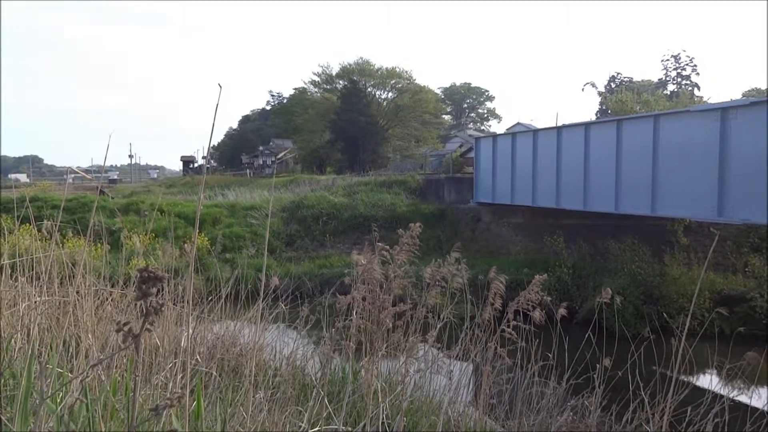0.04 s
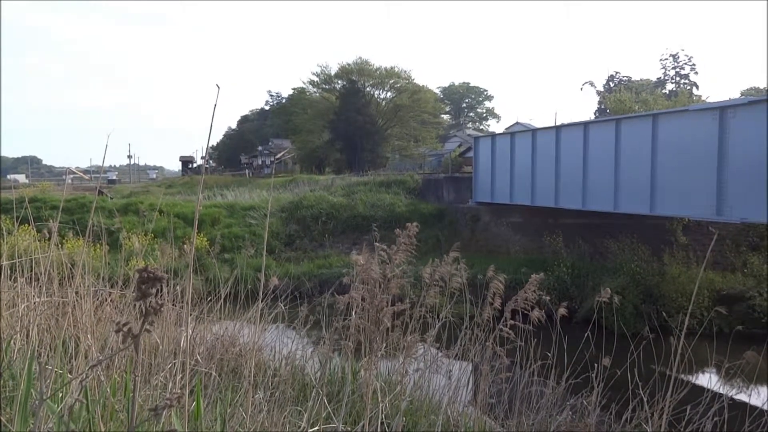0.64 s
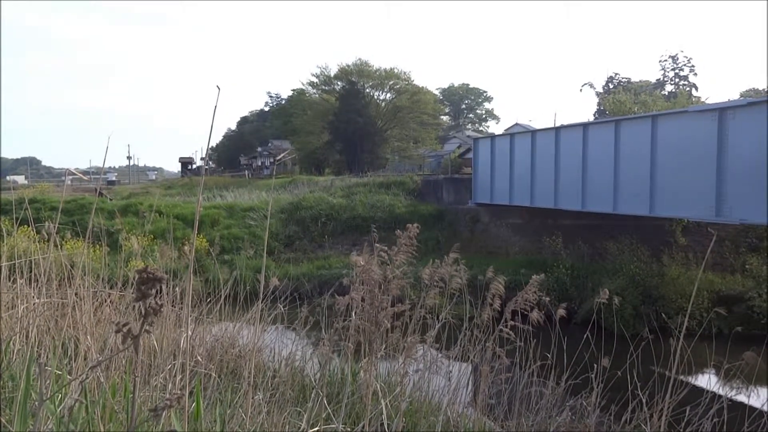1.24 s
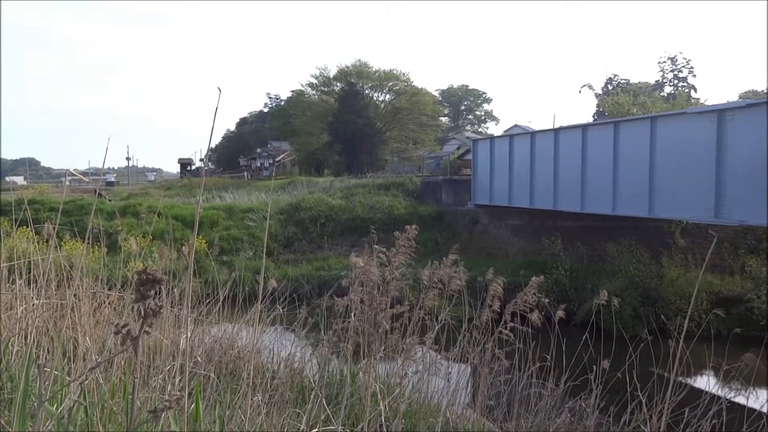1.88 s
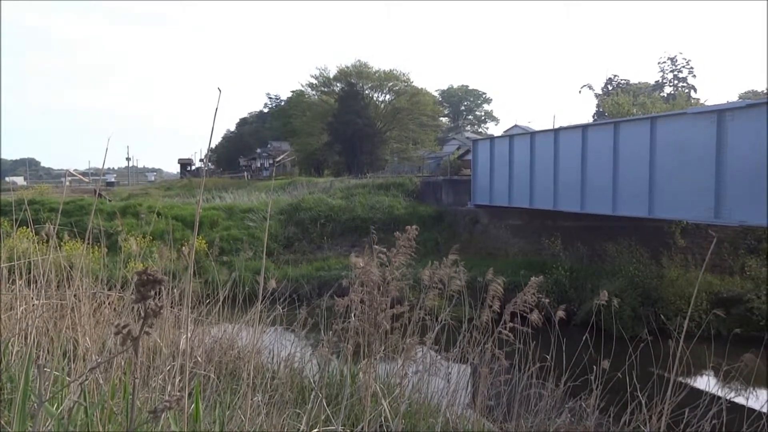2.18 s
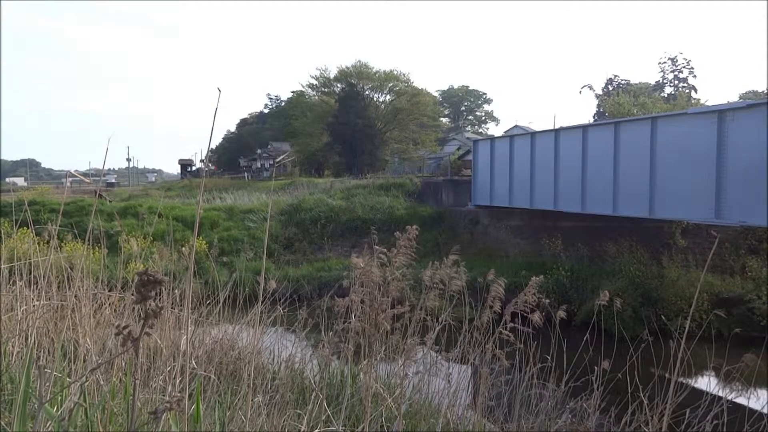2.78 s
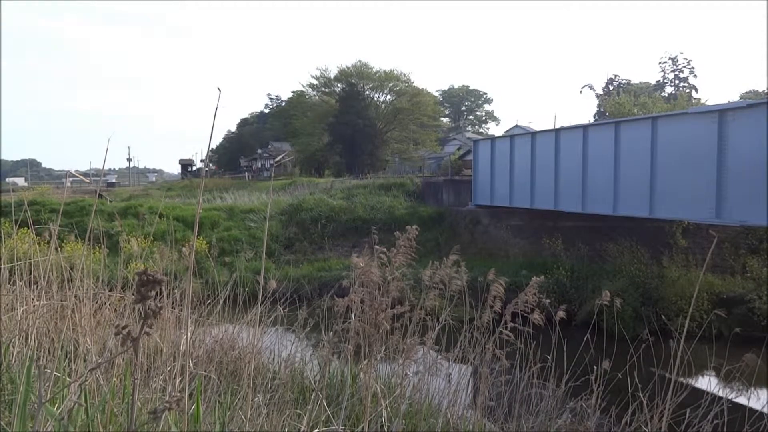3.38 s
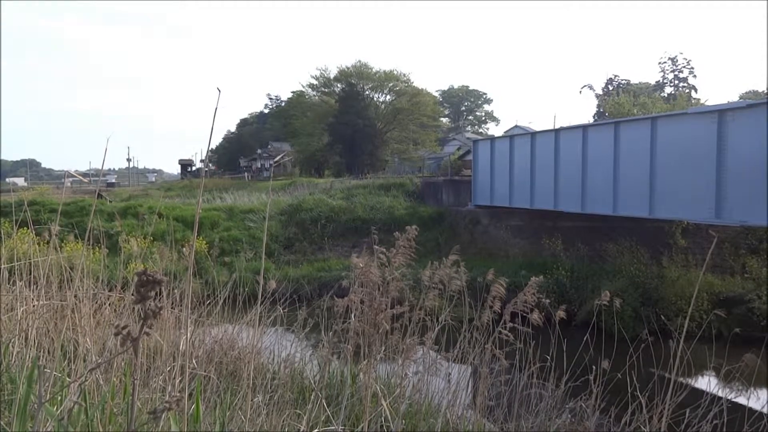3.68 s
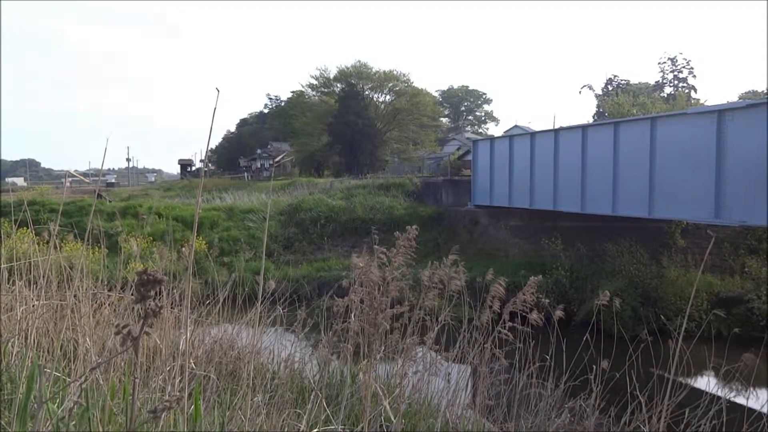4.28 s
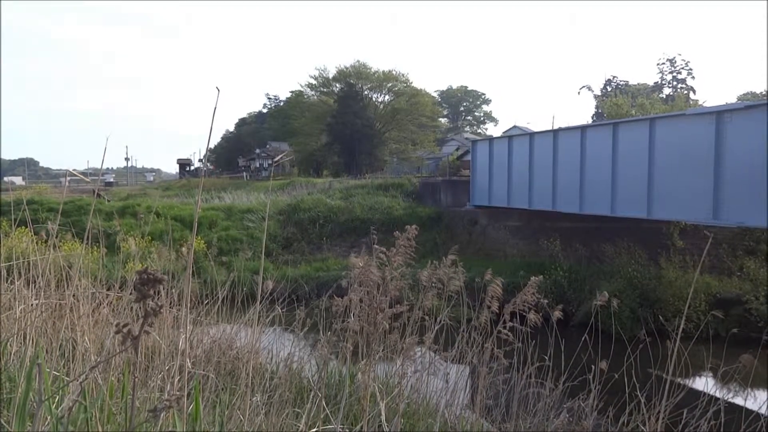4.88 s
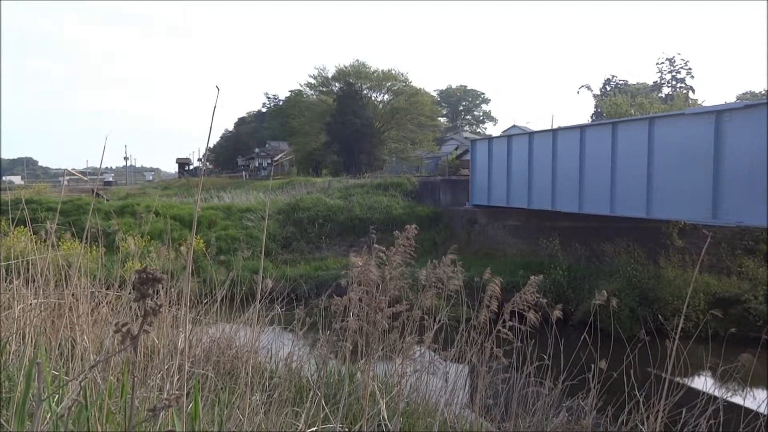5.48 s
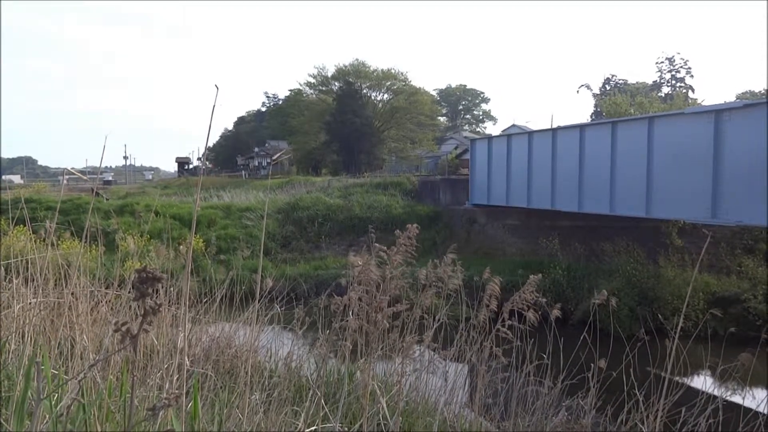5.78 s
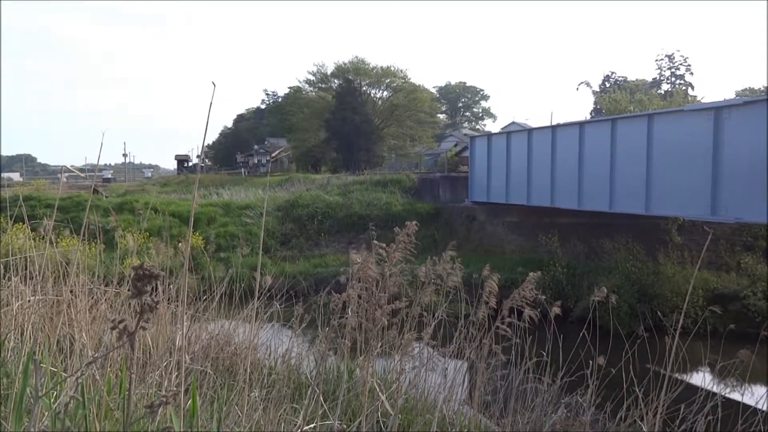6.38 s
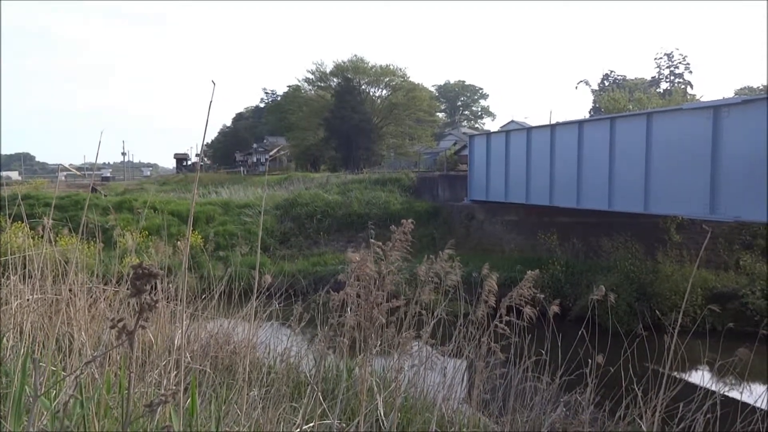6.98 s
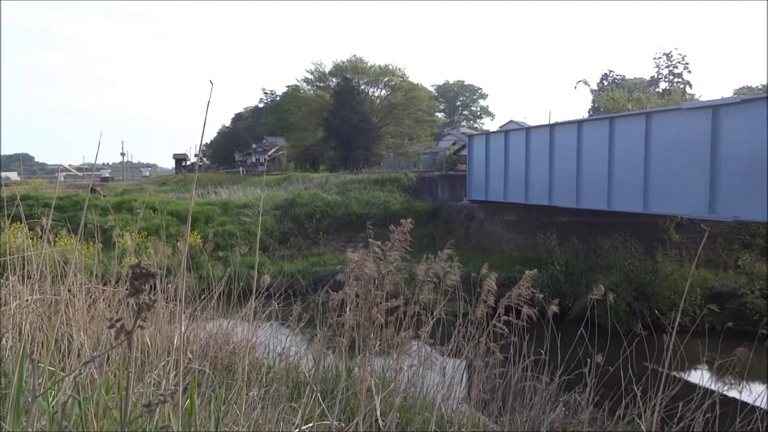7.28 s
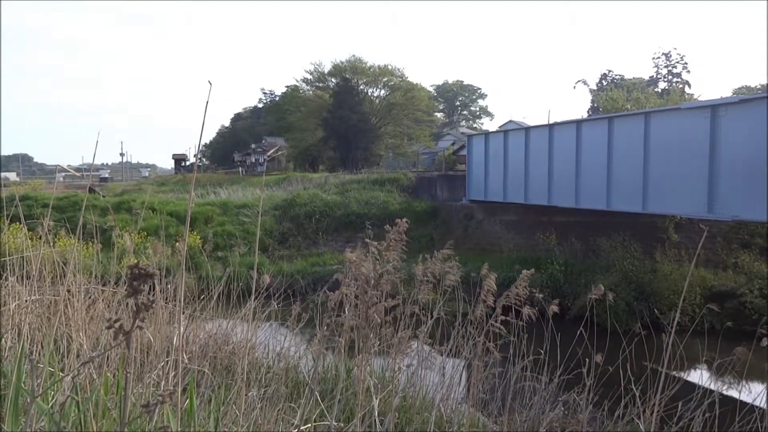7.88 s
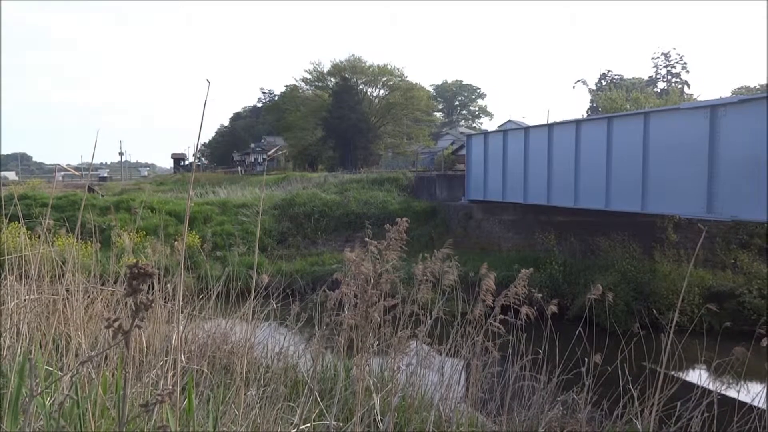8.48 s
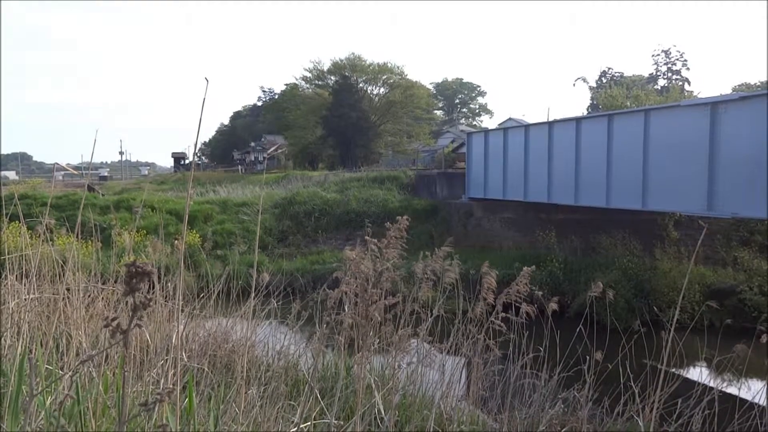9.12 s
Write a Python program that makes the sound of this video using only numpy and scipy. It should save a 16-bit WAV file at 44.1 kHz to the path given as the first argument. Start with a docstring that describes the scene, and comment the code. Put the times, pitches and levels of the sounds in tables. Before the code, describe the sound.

A very high, thin buzz from two crickets runs for the whole nine seconds, over a soft countryside rush on a riverbank. Small birds whistle and chip faintly in the distance, busiest in the first three seconds. Wind bumps the microphone at the start, then drops away. From about 1 to 2 seconds a bullfrog gives one low, mooing bellow that swells and fades. Light puffs of wind follow. A farther frog answers at about 3.6 seconds, and two faint, hoarse cries slide downward, at roughly 3.6 to 4.5 and 5 to 5.8 seconds. Three more distant frog calls come between 5.7 and 7.5 seconds. From about 4.5 seconds, strong gusts thump and flutter on the microphone, becoming the loudest sound and partly covering the calls. They ease around 7.7 seconds and return from 8.5 seconds to the end.

```python
"""A bullfrog bellows from a reedy riverbank; farther frogs answer, with two harsh cries among them.
Each frog's vocal pulses ring its body. Two bush crickets scrape a very high buzz from their wings
in the grass, and small birds whistle and chip far off over a soft countryside rush.
Gusts of wind thump on the microphone as their eddies strike it, hardest in the second half."""
import sys
import numpy as np
from scipy import signal
from scipy.fft import rfft, irfft, next_fast_len
from scipy.io import wavfile
from scipy.ndimage import uniform_filter1d, minimum_filter1d, map_coordinates

SR = 44100
rng = np.random.default_rng(int(sys.argv[2]) if len(sys.argv) > 2 else 0)


def transcribe(signal):
    """Save signal, clipped to [-1, 1], as a 16-bit WAV file at the path in sys.argv[1]."""
    frames = np.atleast_2d(signal).T
    limited = np.clip(frames, -1, 1)
    pcm = np.round(limited * 32767).astype(np.int16)
    wavfile.write(sys.argv[1], SR, pcm)


N = 407925

# tone of the far rush and of the low hum under it: freq_hz, level_db
RUSH_EQ = [(290, -43), (500, -1), (777, 1), (1080, 1), (1190, 3), (2510, -4.5), (2780, -7.5), (3350, -7),
           (3630, -7.5), (4230, -9), (8000, -16.5), (10400, -36), (17600, -120)]
HUM_EQ = [(20, 15), (80, -2), (160, -3), (300, 14.5), (450, 11), (650, -44), (1200, -57)]
# fader ride of the far rush: time_s, level_db
RUSH_LEVEL = [(0, -47.5), (1.05, -47.5), (1.5, -45), (2.2, -47.5), (3.55, -47), (3.9, -44.5), (4.5, -47),
              (8.2, -48.5), (9.25, -46)]
# how alike the bed is on left and right: freq_hz, correlation
BED_LIKENESS = [(100, 1), (700, 0.088), (2000, 0.35), (4000, 0.59), (7000, 1)]
# reverb of the riverbanks: freq_hz, t60_s
BANK_DECAY = [(200, 0.63), (1500, 0.61), (5000, 0.36), (12000, 0.19)]

# light wind between gusts, with its calms: time_s, strength_db
BREEZE = [(0, -37.5), (.95, -50.5), (1.15, -63.5), (1.95, -60), (2.23, -47), (2.9, -42.5), (3.72, -37.5),
          (3.82, -63), (4.03, -67), (4.13, -38), (4.33, -51.5), (4.45, -33), (7.18, -34), (7.7, -38),
          (8.17, -45), (9.12, -39), (9.25, -64)]
# gusts: start_s, hold_s, strength_db, extra_flutter_db
GUSTS = [(0.026, 0.062, -22, -8), (.18, 0.044, -30.5, 9.5), (0.291, 0.11, -30.5, -2),
         (0.625, 0.12, -38.5, 1), (0.901, 0.026, -30.5, -6), (2.214, 0.098, -42, -1),
         (2.484, 0.072, -40.5, -4), (2.716, 0.17, -38, 2), (3.129, 0.033, -29, -5.5),
         (3.247, 0.013, -35.5, 18), (3.506, 0.046, -31, 3.5), (3.633, 0.033, -31, 3.5),
         (4.418, 0.18, -30, 5.5), (4.643, 0.16, -25, 2), (4.84, 0.073, -31.5, 4), (4.975, 0.234, -21.5, 3),
         (5.219, .14, -22, -3), (5.392, 0.074, -24.5, 1), (5.551, 0.15, -25, 1), (5.834, 0.012, -24, 1.5),
         (5.938, 0.14, -24, -3), (6.119, .14, -23.5, 4), (6.294, .2, -25.5, 0.5), (6.576, .04, -31.5, 6.5),
         (6.74, 0.285, -21, -2), (7.052, 0.15, -29, 0), (7.228, 0.13, -22.5, -2.5), (7.413, .14, -25, 1),
         (7.796, 0.0083, -28, -0.5), (7.888, 0.12, -33, -3.5), (8.257, 0.031, -34, 2.5),
         (8.37, 0.079, -34, -15), (8.547, 0.077, -25.5, 2.5), (8.691, 0.12, -26, 3.5),
         (8.867, 0.23, -23.5, 4.5), (9.136, 0.024, -32.5, 11.5)]
# tone of strong rumble, weak puffs and fast flutter: freq_hz, level_db
RUMBLE_EQ = [(15, -38), (30, -34), (50, -18), (90, -7), (160, 2.5), (220, -2), (300, -9.5), (450, -29),
             (1500, -120)]
PUFF_EQ = [(15, -19), (40, -4), (90, 8), (140, 2), (220, -9.5), (450, -51), (1500, -120)]
FLUTTER_EQ = [(60, -50), (130, -15), (220, 3.5), (290, 3.5), (380, -1.5), (500, -10.5), (700, -19),
              (1000, -32.5), (2000, -40), (4000, -120)]
# single eddies on the microphone port: time_s, relative_db
THUMPS = [(0.051, -17), (3.121, -23), (3.252, -21), (4.545, -5.5), (4.658, -17), (4.734, -11),
          (4.971, -2.5), (4.988, -5.5), (5.028, -6.5), (5.06, -2.5), (5.068, -1), (5.099, -7),
          (5.117, -5.5), (5.151, 2.5), (5.191, -12), (5.242, -8), (5.313, -10), (5.337, -12), (5.554, -14),
          (5.611, -4), (6.115, -11.5), (6.207, -5), (6.238, -3), (6.483, -8.5), (6.746, -20.5), (6.816, -6),
          (6.831, -5), (6.924, -6), (6.972, -4.5), (7.232, -7.5), (7.257, -7.5), (7.437, -12.5),
          (8.579, -19), (8.789, -5), (8.864, -11)]
# phase shift between the channels that spreads the buffeting: freq_hz, left_lead_rad
CHANNEL_PHASE = [(20, .05), (60, 0.29), (110, 0.93), (200, 1.3), (330, 1.84), (550, 2.03), (800, 2),
                 (1200, 0.61)]

# falling whistles, sharp down-slurred chips, buzzy chirps and near-level pips: start_s, relative_db
WHISTLES = [(.48, -43), (1.21, -41.5), (1.95, -43), (2.69, -50), (3.46, -48.5), (4.28, -48), (5.04, -45.5),
            (5.74, -45), (6.45, -47.5), (7.13, -52), (7.84, -52), (8.61, -52)]
CHIPS = [(.965, -43.5), (1.415, -40.5), (1.88, -45.5), (2.555, -44.5), (3.24, -44.5), (7.73, -49)]
CHIRPS = [(.555, -43.5), (1.995, -43), (2.58, -47), (3.99, -42), (7.34, -51), (7.97, -40.5), (9.08, -43.5)]
PIPS = [(.12, -49), (.32, -40), (.76, -46), (.95, -48), (1.15, -48), (1.36, -43), (1.57, -46), (1.79, -46),
        (2.2, -45), (2.42, -49.5), (6.82, -50)]
# spells of faint twittering: start_s, end_s, relative_db
TWITTER_SPELLS = [(0.249, 1.098, -49), (1.601, 2.404, -53), (5.999, 7.448, -60)]

# fader ride of both crickets together: time_s, level_db
CRICKET_LEVEL = [(0.05, -26), (0.79, -29.5), (1.0, -28), (1.28, -30), (2.33, -25), (2.94, -28), (3.92, -26),
                 (4.89, -30), (5.1, -32), (5.71, -31), (5.89, -29), (7.05, -30), (7.3, -31), (7.79, -27),
                 (8.53, -29.5), (8.92, -24.5), (9.25, -24.5)]
# crossfade between the crickets: time_s, second_power_share
CRICKET_BALANCE = [(0, 0.24), (2, 0.25), (3.4, 0.029), (4.3, 0.12), (5.3, 0.36), (6.1, 0.82), (7.5, 0.51),
                   (8.4, 0.64), (8.8, 0.83), (9.25, 0.97)]
# wing strokes of each cricket: time_s, first_rate_hz, second_rate_hz
STROKE_RATES = [(0, 115.5, 123), (1.2, 115, 123), (2, 116, 123), (3.4, 117.2, 123.4), (6.1, 117.4, 122.6),
                (9.25, 117.2, 123.2)]
# ringing bands of each cricket's wings: centre_hz, width_hz, level_db
FIRST_WING_MODES = [(9820, 110, -2.5), (10386, 220, -0.5), (11000, 220, 1.5), (11740, 330, -2),
                    (12600, 350, -6), (12880, 300, -1), (13240, 150, -1.5), (14000, 620, -4.5)]
SECOND_WING_MODES = [(9615, 270, -6), (10570, 155, -4), (11200, 210, -2.5), (11600, 210, 0),
                     (12330, 210, 3), (12630, 180, -0.5), (13700, 240, -0.5), (14200, 300, 5.5)]
# overall tone of the buzz: freq_hz, level_db
BUZZ_EQ = [(7000, -46), (8300, -26), (8900, -9), (9500, -2), (10300, 0.5), (13300, -1.5), (14300, -12),
           (15000, -14.5), (15500, -3)]

# path of each harsh cry, one list a cry: time_s, level_db, centre_hz, nominal_width_hz
CRY_PATHS = [
    [(3.62, -59, 2000, 784), (3.76, -48.5, 1930, 800), (3.86, -52, 1870, 950), (3.96, -49, 1490, 650),
     (4.1, -50.5, 1490, 600), (4.27, -47.5, 1550, 650), (4.37, -54, 1650, 650), (4.5, -60, 1500, 600)],
    [(5.03, -65, 2200, 1000), (5.1, -46, 2000, 1100), (5.18, -43, 1900, 1000), (5.3, -49, 1560, 600),
     (5.44, -48.5, 1530, 350), (5.58, -50.5, 1520, 330), (5.7, -51, 1580, 400), (5.79, -61, 1550, 400)],
]
# answering frogs: start_s, end_s, pitch_hz, level_db, ring_hz, half_width_hz, throat_db, sac_db
ANSWERS = [(3.626, 4.131, 75.3, -43, 956, 170, -6, -9.5), (5.703, 6.287, 89.7, -46.5, 1000, 258, 5.5, -22),
           (6.098, 6.975, 81.7, -50.5, 1195, 110, -26, -25), (6.931, 7.444, 73.34, -41.5, 940, 130, 0, -19)]
# the near bellow, a row each for throat, eardrums and vocal sac: start_s, end_s, level_db, swell_s, fade_s
BELLOW_LAYERS = [(1, 1.85, -40.5, 0.27, 0.19), (1.126, 1.814, -36, 0.18, 0.35),
                 (0.98, 1.886, -42, 0.51, 0.26)]
# tone that each of those parts radiates: freq_hz, level_db
THROAT_EQ = [(380, -35), (480, -25), (560, 14), (640, 4), (720, 15.5), (805, 12.5), (880, -7), (1000, -28),
             (1300, -70)]
EARDRUM_EQ = [(850, -26.5), (970, -27), (1050, -7.5), (1130, -14.5), (1210, -7), (1290, 0), (1370, -8),
              (1450, -9.5), (1620, -28), (1850, -22.5), (2350, -35), (2590, -25), (2900, -28), (5000, -48)]
SAC_EQ = [(40, -44), (80, -19), (160, -14), (240, 1), (320, 4.5), (400, -9), (520, -11), (900, -84)]


def amp(db):
    return 10 ** (np.asarray(db) / 20)


def unit_rms(x):
    return x / np.sqrt(np.mean(x ** 2) + 1e-20)


def at_freq(points, hz):
    """Read (freq_hz, value) points along a log frequency axis."""
    freqs, values = np.transpose(points)
    return np.interp(np.log(hz + 1), np.log(freqs + 1), values)


def curves(rows):
    """One value per sample for each column after the time."""
    times, *columns = np.transpose(rows)
    return [np.interp(np.arange(N) / SR, times, column) for column in columns]


def gate(rows):
    """Open over the time span of a table, with 20 ms fades outside it."""
    t = np.arange(N) / SR
    return np.clip(1 + np.minimum(t - rows[0][0], rows[-1][0] - t) / .02, 0, 1)


def wobble(rate_hz):
    """A smooth random curve through rate_hz knots a second."""
    knots = rng.standard_normal(int(N * rate_hz / SR) + 4)
    coarse = np.arange(0, N, 16)
    return np.interp(np.arange(N), coarse, map_coordinates(knots, [coarse * rate_hz / SR]))


def filtered(x, response):
    """Filter x by a complex response of frequency."""
    size = next_fast_len(N + SR // 4, True)
    return irfft(rfft(x, size) * response(np.fft.rfftfreq(size, 1 / SR)), size)[..., :N]


def noise(eq):
    """Coloured noise of rms 1."""
    return unit_rms(filtered(rng.standard_normal(N), lambda hz: amp(at_freq(eq, hz))))


def ring(x, eq, size=4096):
    """Let x ring a body: a minimum-phase filter with the given tone."""
    cepstrum = irfft(np.log(amp(at_freq(eq, np.fft.rfftfreq(size, 1 / SR)))))
    cepstrum[1:size // 2] *= 2
    cepstrum[size // 2 + 1:] = 0
    return signal.oaconvolve(x, irfft(np.exp(rfft(cepstrum))))[:N]


def formant(hz, centre, width):
    """Two identical band-pass resonances in series."""
    return (1j * hz * width / (centre ** 2 - hz ** 2 + 1j * hz * width)) ** 2


def outdoors(x, wet_db):
    """A centred source and its stereo scatter from the banks and the bridge."""
    hz, t, spectra = signal.stft(rng.standard_normal((2, SR // 2)), SR, nperseg=256)
    decay = amp(-60 * t / at_freq(BANK_DECAY, hz)[:, None])
    tail = signal.istft(spectra * decay, SR, nperseg=256)[1]
    tail = np.pad(tail / np.linalg.norm(tail[0]), ((0, 0), (400, 0)))  # 9 ms pre-delay
    return x + amp(wet_db) * signal.oaconvolve(x[None], tail, axes=1)[:, :N]


def countryside():
    """The bed: a steady far rush over a low hum, widest in the midrange."""
    spread = lambda hz: np.arccos(np.clip(at_freq(BED_LIKENESS, hz), -1, 1)) / 2
    sway_db = .5 * wobble(5)
    rush = amp(curves(RUSH_LEVEL)[0] + sway_db) * np.array([noise(RUSH_EQ), noise(RUSH_EQ)])
    hum = amp(-59) * np.array([noise(HUM_EQ), noise(HUM_EQ)])
    mid, side = filtered(rush + hum, lambda hz: np.array([np.cos(spread(hz)), np.sin(spread(hz))]))
    return np.array([mid + side, mid - side])


def bird_notes(cues, glide_hz, length_s, trill, trill_hz, vary):
    """One bird repeats a trilled note that slides through glide_hz, a little different each time."""
    out, t = np.zeros(N + SR), np.arange(int(length_s * SR)) / SR
    progress = t / length_s
    for start, db in cues:
        turns = np.array(glide_hz) * (1 + vary * rng.standard_normal(len(glide_hz)))
        warble = np.sin(2 * np.pi * trill_hz * t * (1 + 0.051 * rng.standard_normal()))
        pitch = np.interp(progress, np.linspace(0, 1, len(turns)), turns) * (1 + trill * warble)
        swell = np.abs(np.sin(np.pi * progress)) ** 0.46 * (1 + 0.081 * warble)
        out[int(start * SR):][:len(t)] += amp(db) * swell * np.sin(2 * np.pi * np.cumsum(pitch) / SR)
    return out[:N]


def birds():
    """Far birds, blurred by the trees, with a slap echo off the bridge girder."""
    whistles = bird_notes(WHISTLES, [2990, 2763, 2643, 2476],
                          length_s=0.15, trill=0.018, trill_hz=112.3, vary=0.0134)
    chips = bird_notes(CHIPS, [4070, 4370, 5260, 4190, 3690, 3740, 3500, 3430],
                       length_s=0.056, trill=0.01, trill_hz=140, vary=0.0267)
    chirps = bird_notes(CHIRPS, [4480, 3680, 4100, 4060],
                        length_s=0.037, trill=0.045, trill_hz=120, vary=.05)
    pips = bird_notes(PIPS, [3130, 3060, 3020], length_s=0.0426, trill=0.025, trill_hz=105, vary=0.016)
    cues = [(s, db + 2 * rng.standard_normal())
            for start, end, db in TWITTER_SPELLS for s in rng.uniform(start, end, size=8)]
    twitter = bird_notes(cues, [3700, 3950, 3500], length_s=.055, trill=0.029, trill_hz=88.4, vary=0.13)
    song = amp(-0.5) * (whistles + chips + chirps + pips + twitter)
    echo = amp(-12.5) * np.roll(song, int(0.061 * SR))
    return outdoors(song + echo, wet_db=-4)


def cricket(rate_hz, modes, stroke_width, rest_pressure, hiss, drift_db):
    """Each closing of the wings drags a file over a scraper: the same teeth each time, plus fresh hiss."""
    phase = np.cumsum(rate_hz * (1 + .002 * wobble(40))) / SR % 1
    teeth = unit_rms(irfft(np.exp(2j * np.pi * rng.random(180)), 16384))
    pressure = rest_pressure + np.exp(-((phase - .5) / stroke_width) ** 2)
    scrape = pressure * (teeth[(phase * len(teeth)).astype(int)] + hiss * rng.standard_normal(N))
    hz, t, spectra = signal.stft(scrape, SR, nperseg=2048)
    power = amp(-16) ** 2  # floor between the ringing bands
    for centre, width, db in modes:
        drift = np.interp(t, np.arange(12), rng.standard_normal(12))  # each band swells on its own
        power = power + amp(db + drift_db * drift) ** 2 / (1 + (2 * (hz[:, None] - centre) / width) ** 2)
    wings = np.sqrt(power) * amp(at_freq(BUZZ_EQ, hz))[:, None]
    return unit_rms(signal.istft(spectra * wings, SR, nperseg=2048)[1][:N])


def crickets():
    """Two insects with slightly different stroke rates beat against each other, just left of centre."""
    rate_a, rate_b = curves(STROKE_RATES)
    share = np.clip(curves(CRICKET_BALANCE)[0], 0, 1)
    first = cricket(rate_a, FIRST_WING_MODES, stroke_width=.25, rest_pressure=.8, hiss=.65, drift_db=1.5)
    second = cricket(rate_b, SECOND_WING_MODES,
                     stroke_width=.13, rest_pressure=.66, hiss=.65, drift_db=1.2)
    buzz = amp(curves(CRICKET_LEVEL)[0]) * (np.sqrt(1 - share) * first + np.sqrt(share) * second)
    scatter = amp(-20.5) * np.roll(buzz, SR // 200)  # a 5 ms delay widens the image
    return np.array([buzz + scatter, buzz - scatter]) * amp([[.35], [-.35]])


def eddies(eq, lumps_db, rate_hz):
    """Random pressure kicks, bunched in lumps and levelled so their mean strength stays steady."""
    kicks = (rng.random(N) < rate_hz / SR) * rng.standard_normal(N) * amp(lumps_db)
    pressure = unit_rms(filtered(kicks, lambda hz: amp(at_freq(eq, hz))))
    power = uniform_filter1d(uniform_filter1d(pressure ** 2, size=SR // 15), size=SR // 30)
    return pressure / np.sqrt(np.abs(power) + 0.0012)


def gust_envelopes():
    """Each gust jumps out of the breeze, holds and dies away; flutter grows faster than rumble."""
    attack_s, release_s = 0.016, 0.019
    equal_db, growth = -20, 1.96  # strength where flutter equals rumble; flutter dB per dB of strength
    flutter_of = lambda db: amp(equal_db + growth * (db - equal_db))
    t, breeze_db = np.arange(N) / SR, curves(BREEZE)[0]
    rumble, flutter = amp(breeze_db), flutter_of(breeze_db)
    for start, hold, db, extra_db in GUSTS:
        near = slice(max(int((start - .5) * SR), 0), int((start + hold + .5) * SR))
        age = t[near] - start
        shape = np.exp(np.minimum(age, 0) / attack_s - np.maximum(age - hold, 0) / release_s)
        rumble[near] = np.maximum(rumble[near], amp(db) * shape)
        flutter[near] = np.maximum(flutter[near], flutter_of(db) * amp(extra_db) * shape ** growth)
    return rumble, flutter


def thumps():
    """Single eddies hit the microphone port: a swing or two of pressure, quicker on harder hits."""
    out, t = np.zeros(N), np.arange(N) / SR
    for (s, db), (detune, phase) in zip(THUMPS, rng.standard_normal((len(THUMPS), 2))):
        near = slice(max(int((s - .02) * SR), 0), int((s + .02) * SR))
        swing_hz = 320 * np.exp(0.18 * detune + 0.033 * (db + 10.0))
        cycles = (t[near] - s - .002) * swing_hz
        out[near] += amp(db - 2) * np.exp(-(cycles / 0.62) ** 2) * np.cos(2 * np.pi * cycles + phase)
    return out


def wind():
    """Lumpy buffeting, fluttering in strong gusts; a phase shift between the channels spreads it."""
    rumble_gain, flutter_gain = gust_envelopes()
    lumps = wobble(55)
    gusts = eddies(RUMBLE_EQ, 6.2 * lumps, rate_hz=700)
    puffs = eddies(PUFF_EQ, 4 * wobble(28), rate_hz=300)  # weak puffs shed slower, deeper eddies
    gust_share = rumble_gain / (rumble_gain + amp(-37.5))
    rumble = rumble_gain * (np.sqrt(gust_share) * gusts + np.sqrt(1 - gust_share) * puffs)
    flutter = flutter_gain * eddies(FLUTTER_EQ, 3.5 * lumps, rate_hz=260)
    buffet = rumble + flutter + thumps()
    spread = lambda hz: np.tan(np.clip(at_freq(CHANNEL_PHASE, hz), 0, 2.3) / 2)
    # a small part of the turbulence differs between the two sides
    width = amp(-16.5) * rumble_gain * noise(RUMBLE_EQ) + amp(-12.0) * flutter_gain * noise(FLUTTER_EQ)
    sides = np.array([[1], [-1]])
    return filtered(buffet, lambda hz: 1 + 1j * spread(hz) * sides) + width * sides


def vocal_pulses(pitch_hz, jitter, rough):
    """The vocal folds give one click a cycle, each followed by a short puff of noise."""
    cycles = np.cumsum(pitch_hz * (1 + jitter * wobble(60))) / SR
    clicks = np.diff(np.floor(cycles), prepend=0)
    puffs = rng.standard_normal(N) * np.exp(-4 * (cycles % 1))
    return unit_rms(clicks) + rough * unit_rms(puffs)


def harsh_cries():
    """Hoarse rasps whose single broad resonance slides down."""
    out = np.zeros(N)
    for cry in CRY_PATHS:
        times, _, centre, width = np.transpose(cry)
        rasp = vocal_pulses(115 + 14 * wobble(14), jitter=.12, rough=5.5)
        hz, t, spectra = signal.stft(rasp, SR, nperseg=256)
        centre, width = np.interp(t, times, centre), np.interp(t, times, width)
        mouth = 1 / (1 + ((hz[:, None] - centre) / (0.87 * width)) ** 2) ** 2.4 / np.sqrt(width)
        voice = unit_rms(signal.istft(spectra * mouth, SR, nperseg=256)[1][:N])
        out += voice * amp(curves(cry)[0]) * gate(cry)
    return outdoors(out, wet_db=-3.5)


def answering_frogs():
    """Farther frogs pulse three body resonances; loudness and pitch arch together over each call."""
    t, out = np.arange(N) / SR, np.zeros(N)
    for start, end, pitch, db, ring_hz, half_width, throat_db, sac_db in ANSWERS:
        effort = np.abs(np.sin(np.pi * np.clip((t - start) / (end - start), 0, 1)))
        folds = vocal_pulses(pitch * (1 - .06 * (1 - effort)), jitter=.004, rough=.22)
        body = lambda hz: (formant(hz, ring_hz, 2 * half_width)
                           + amp(throat_db) * formant(hz, 770, 89)
                           + amp(sac_db) * formant(hz, 253, 130))
        out += amp(db) * effort ** 0.68 * unit_rms(filtered(folds, body))
    return outdoors(out, wet_db=-4.5)


def bullfrog():
    """Slow vocal pulses ring the throat, the eardrums and the sac, each swelling in its own time."""
    t, out = np.arange(N) / SR, np.zeros(N)
    # the pulse rate arches with the push of the lungs
    push_s, peak_hz, sag_hz_per_s2, slack_hz = 1.43, 80.7, 66, 69
    pitch = np.maximum(peak_hz - sag_hz_per_s2 * (t - push_s) ** 2, slack_hz)
    folds = vocal_pulses(pitch, jitter=.003, rough=.24)
    for (start, end, db, swell, fade), body in zip(BELLOW_LAYERS, (THROAT_EQ, EARDRUM_EQ, SAC_EQ)):
        effort = np.clip(np.minimum((t - start) / swell, (end - t) / fade), 0, 1)
        out += amp(db) * np.sin(np.pi / 2 * effort) ** 2 * unit_rms(ring(folds, body))
    return outdoors(out, wet_db=-10.0)


def scene():
    """The stereo riverbank mix."""
    return bullfrog() + answering_frogs() + harsh_cries() + crickets() + birds() + wind() + countryside()


def record(dry, cutoff_hz=15200):
    """A limiter ducks the mix on gust peaks over full scale; a brick-wall low-pass trims the top."""
    needed_gain = 1 / np.maximum(np.abs(dry).max(axis=0), 1)
    gain = uniform_filter1d(minimum_filter1d(needed_gain, size=SR // 150), size=SR // 150)
    return filtered(dry * gain, lambda hz: hz < cutoff_hz)


dry = scene()
out = record(dry)
transcribe(out)
```